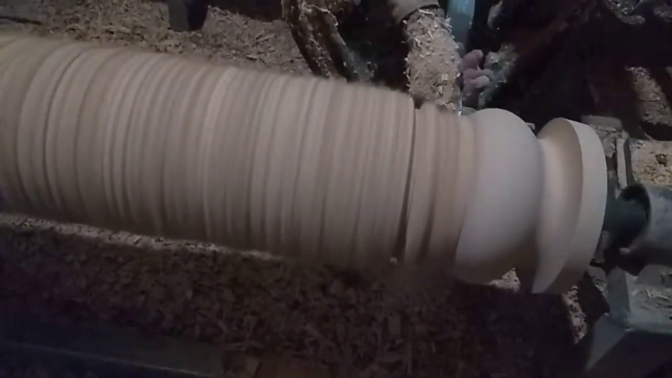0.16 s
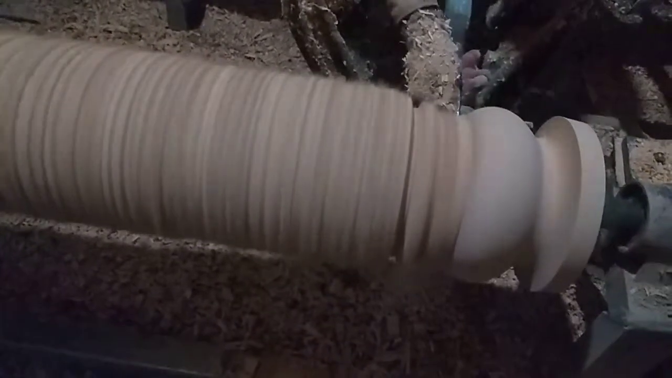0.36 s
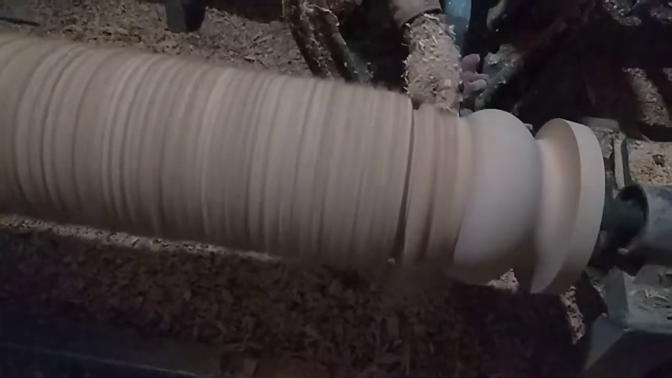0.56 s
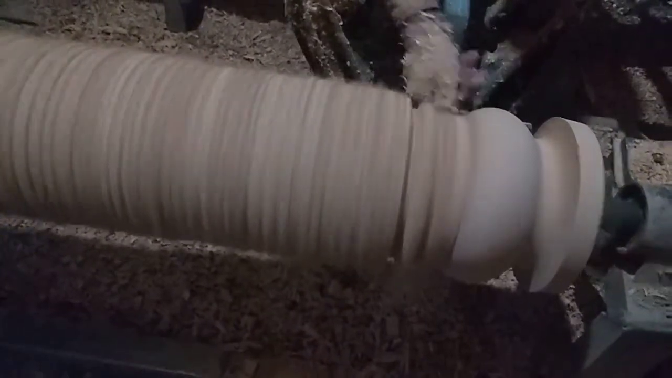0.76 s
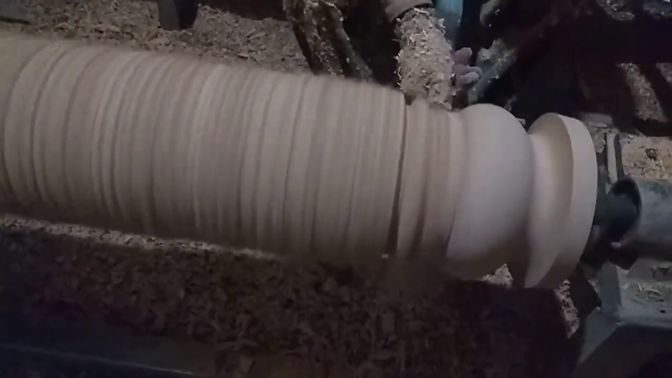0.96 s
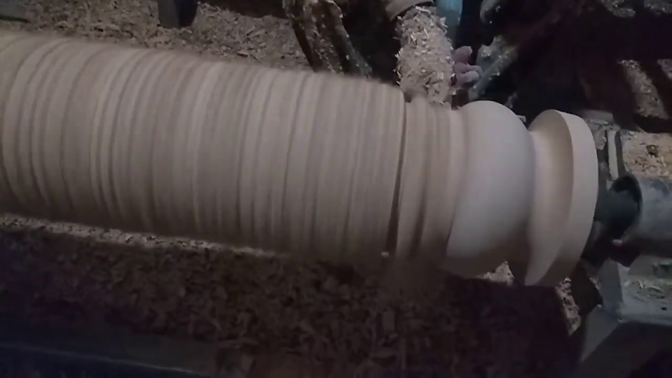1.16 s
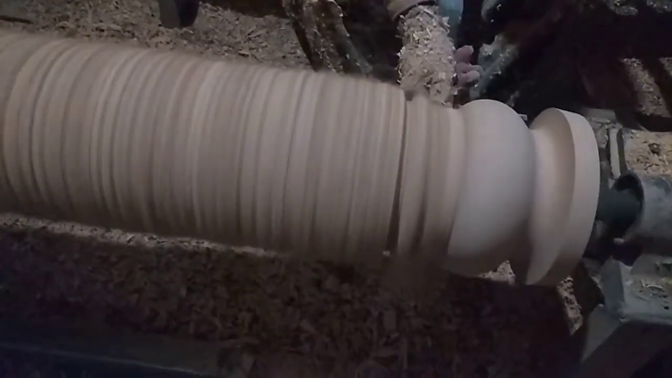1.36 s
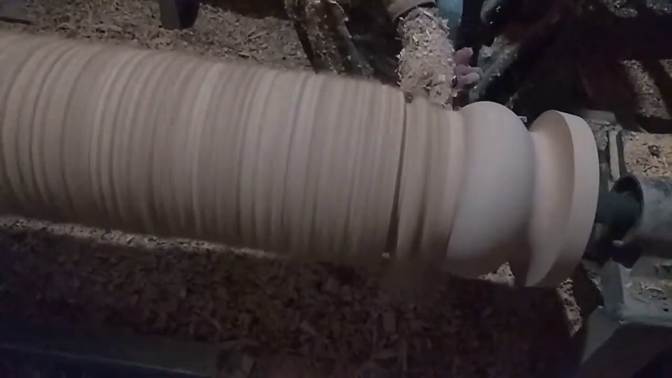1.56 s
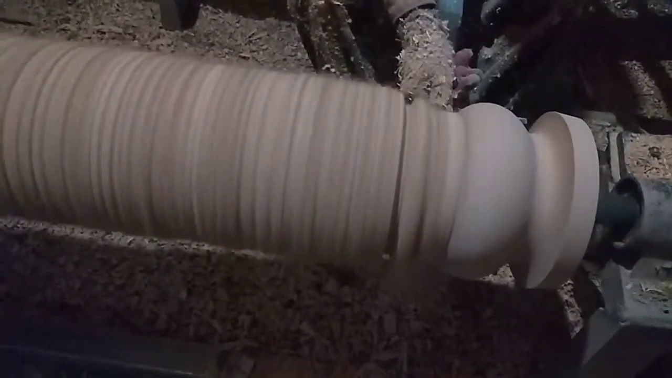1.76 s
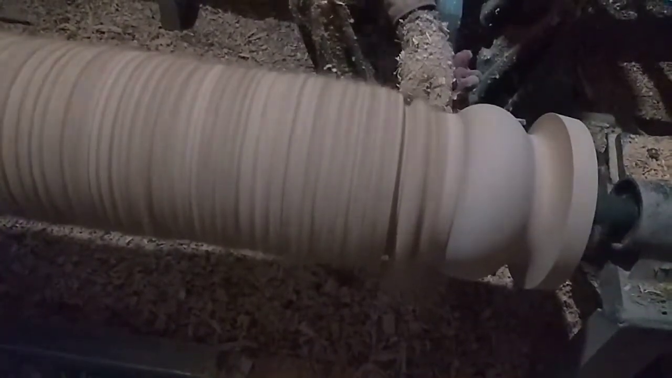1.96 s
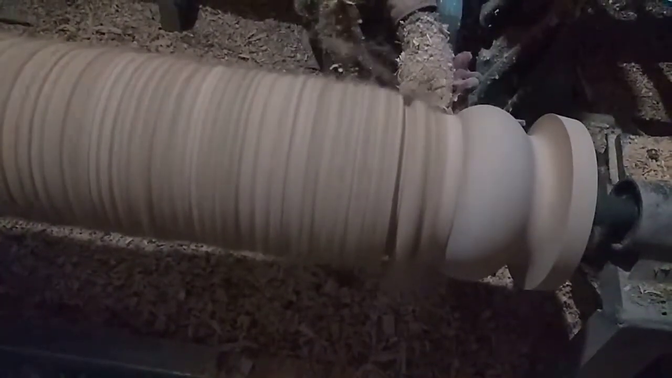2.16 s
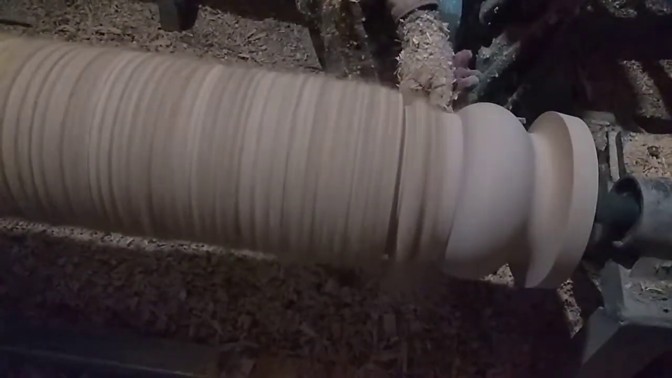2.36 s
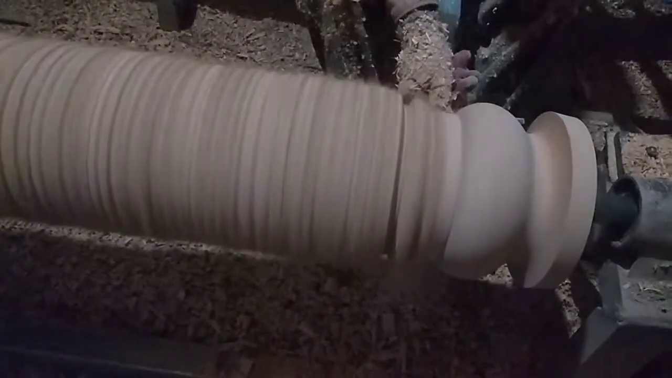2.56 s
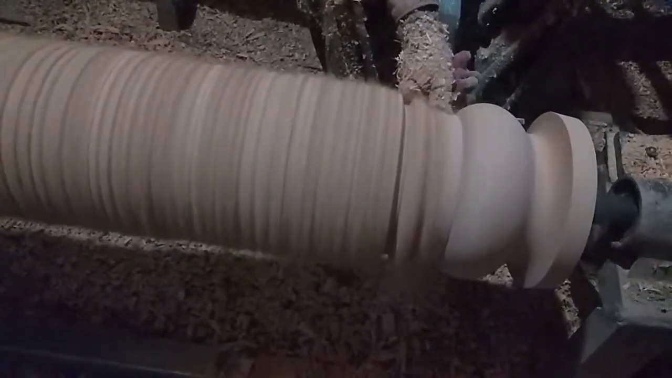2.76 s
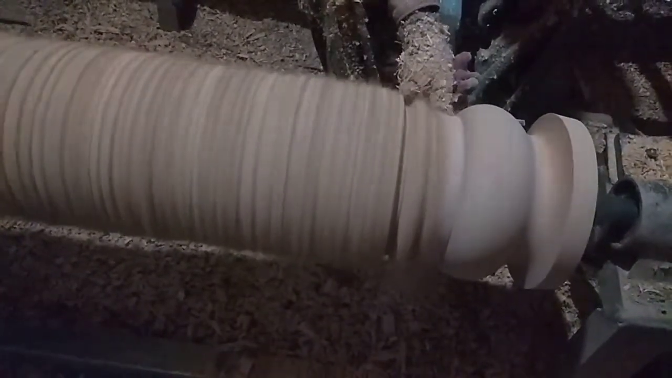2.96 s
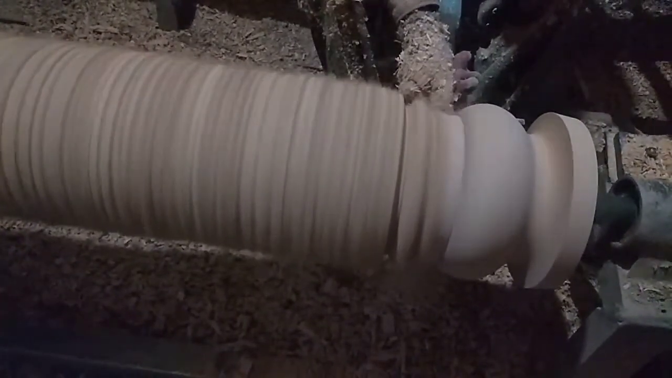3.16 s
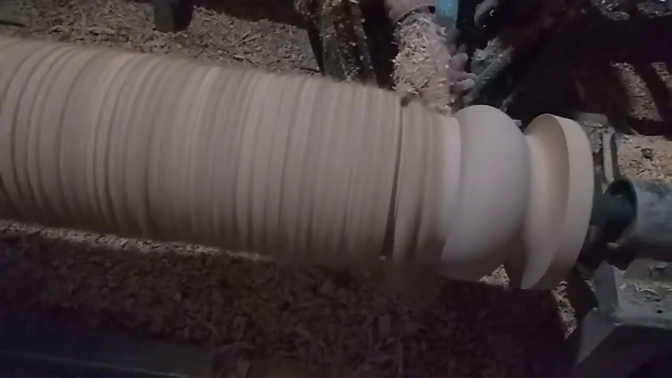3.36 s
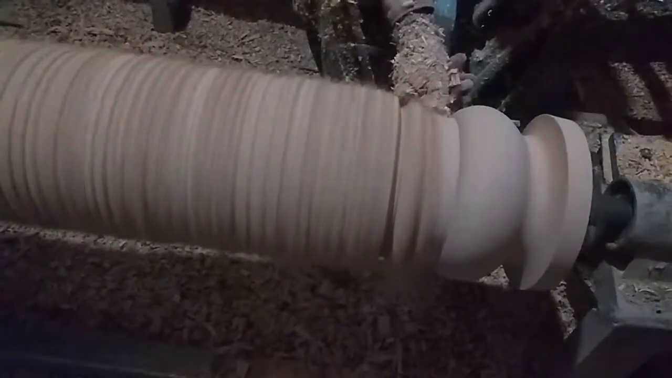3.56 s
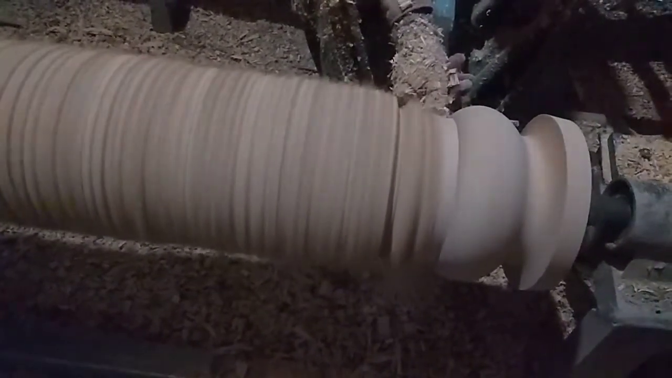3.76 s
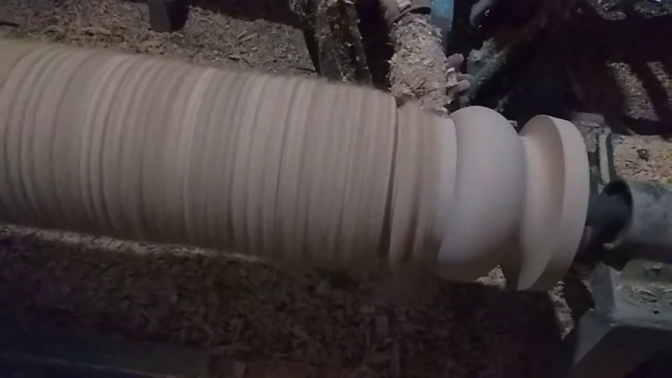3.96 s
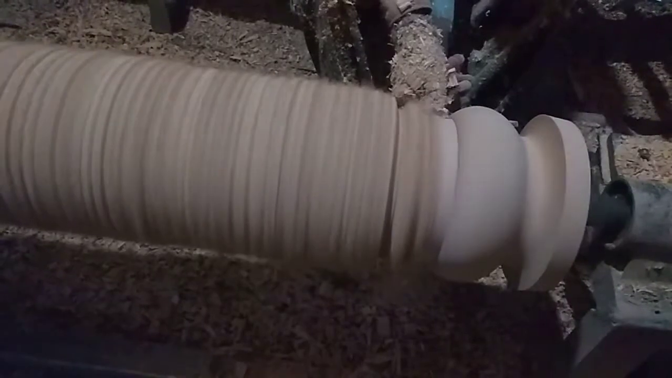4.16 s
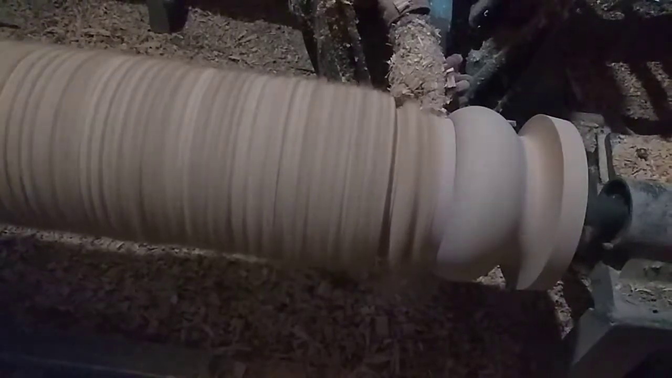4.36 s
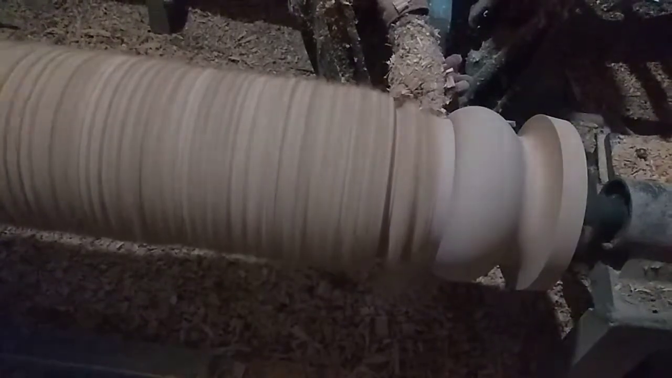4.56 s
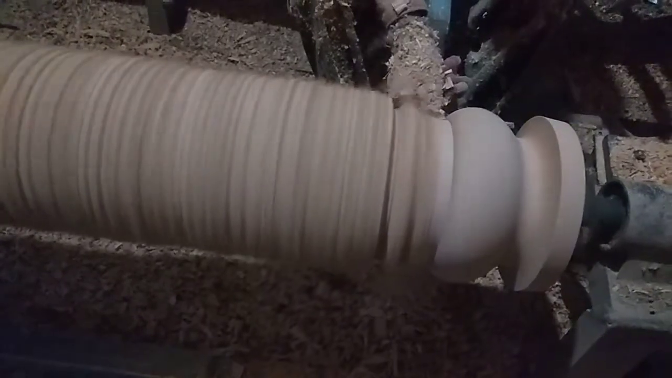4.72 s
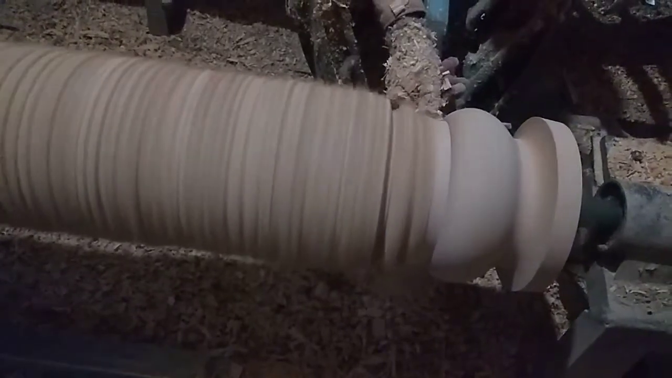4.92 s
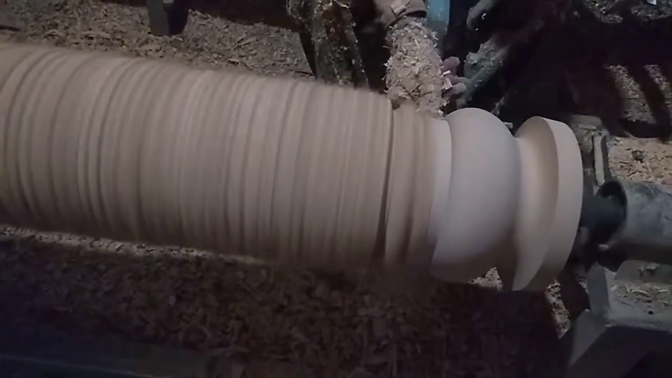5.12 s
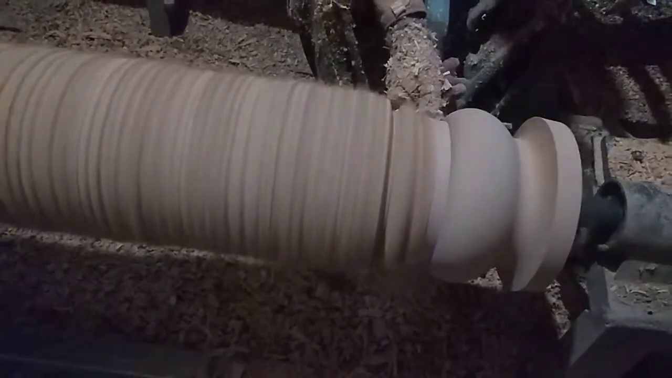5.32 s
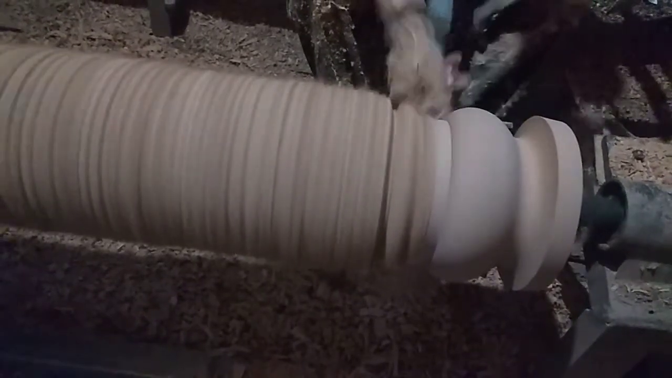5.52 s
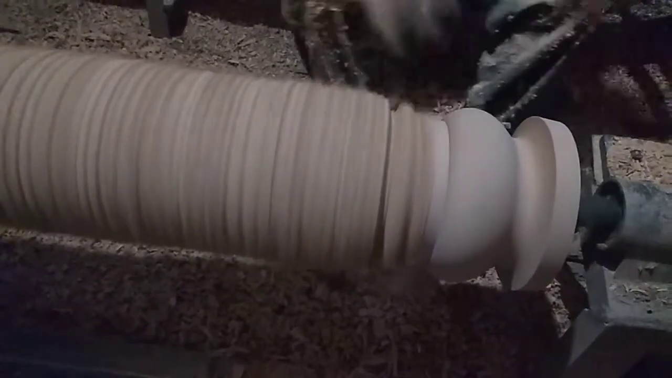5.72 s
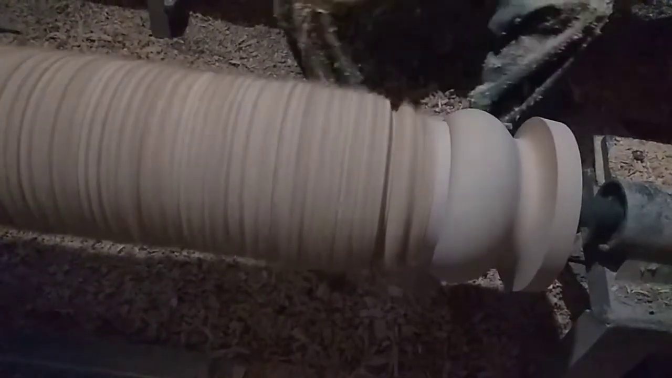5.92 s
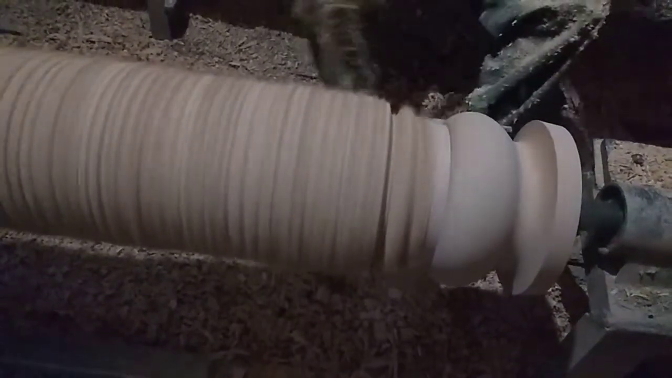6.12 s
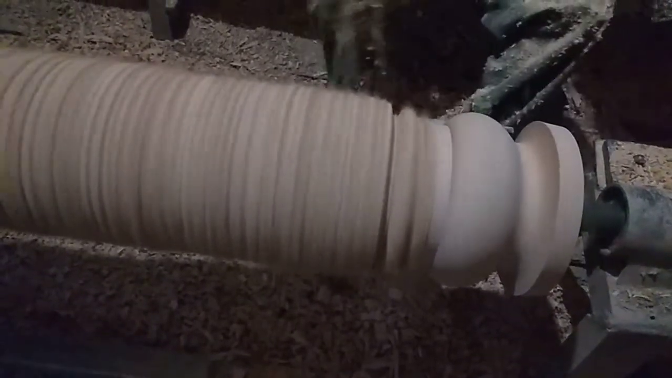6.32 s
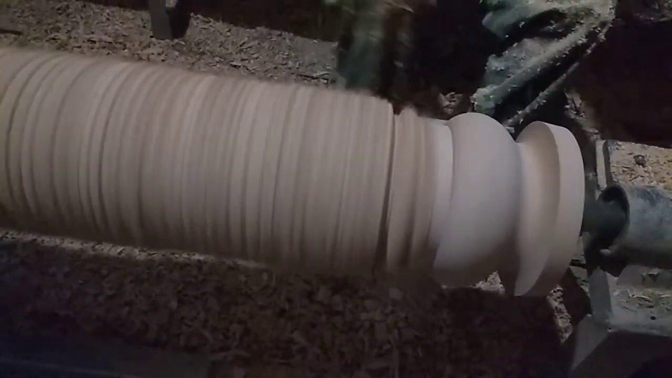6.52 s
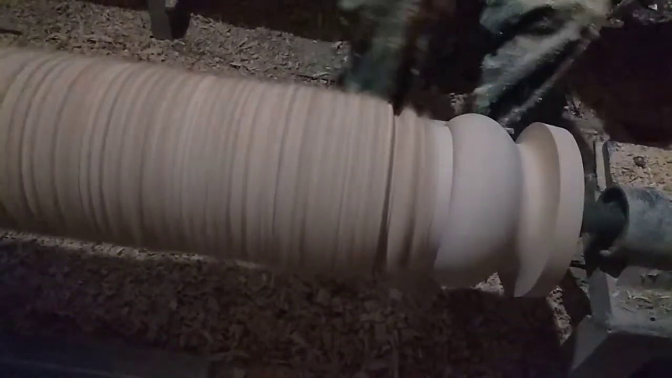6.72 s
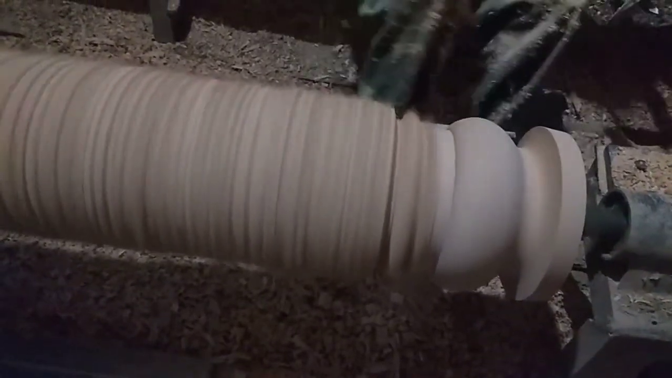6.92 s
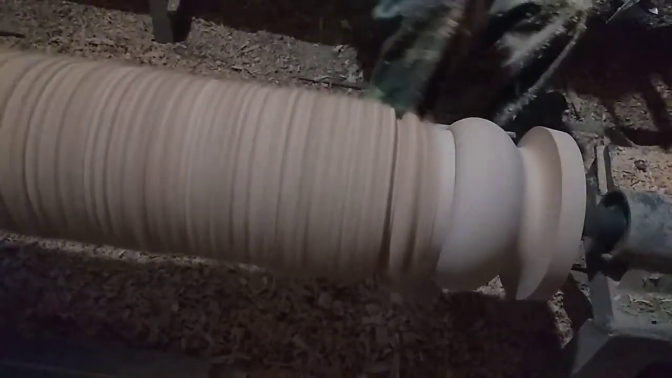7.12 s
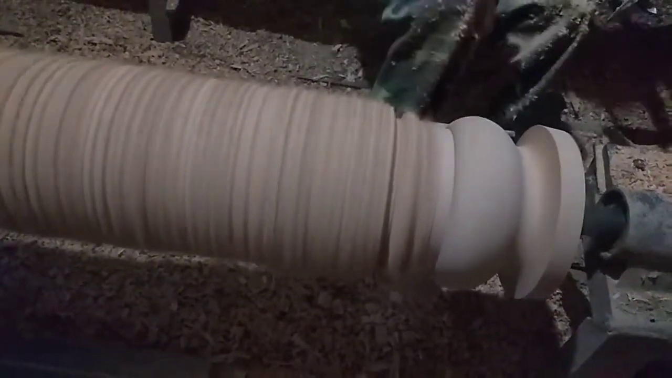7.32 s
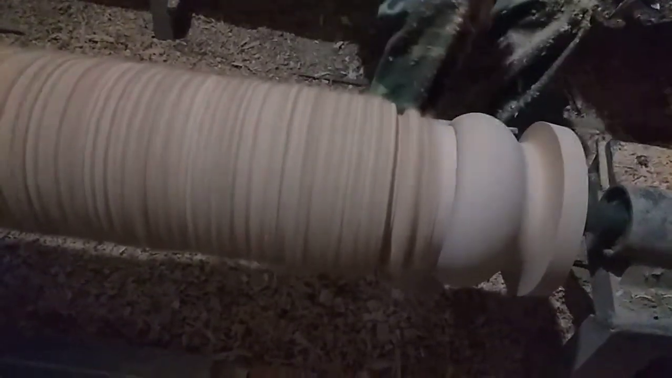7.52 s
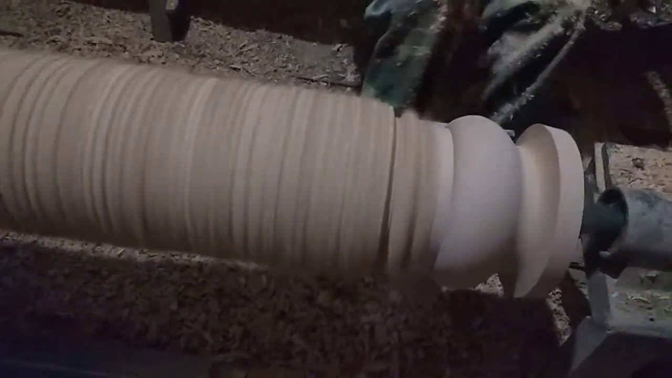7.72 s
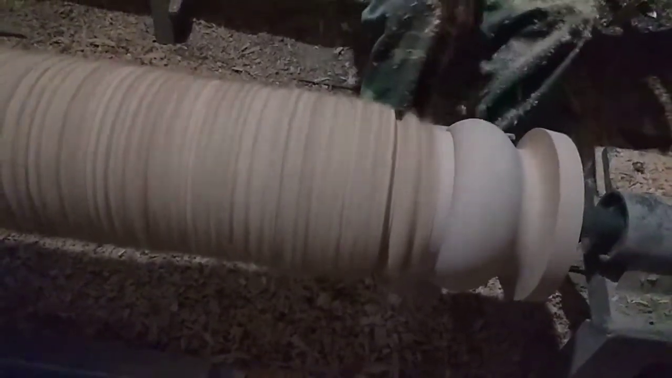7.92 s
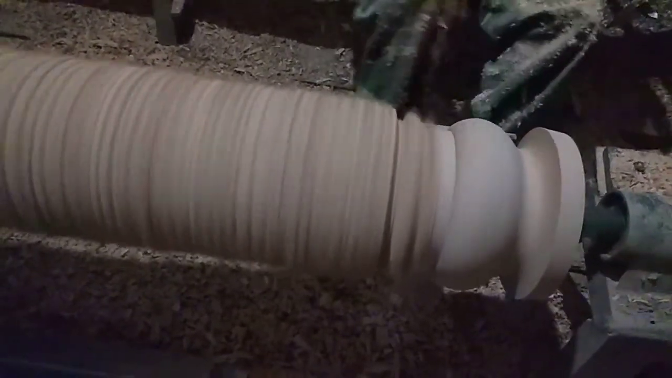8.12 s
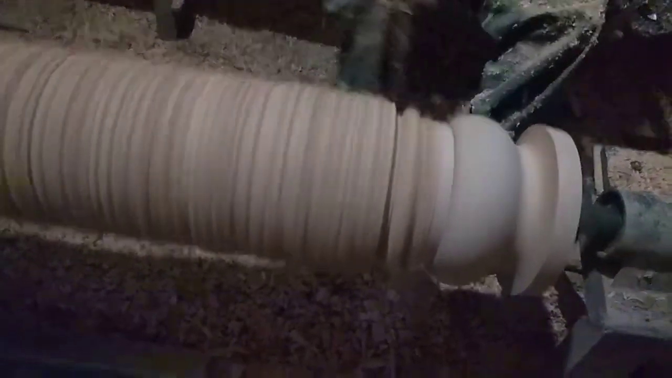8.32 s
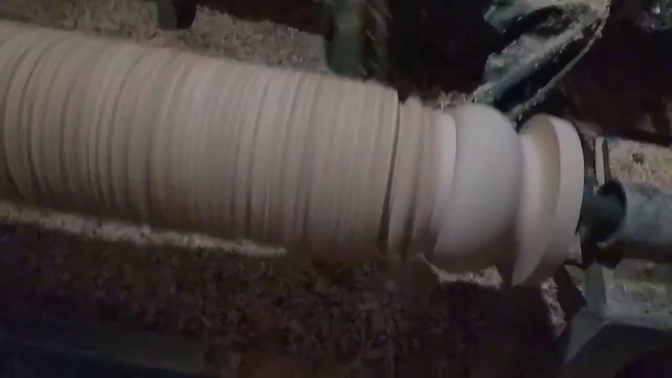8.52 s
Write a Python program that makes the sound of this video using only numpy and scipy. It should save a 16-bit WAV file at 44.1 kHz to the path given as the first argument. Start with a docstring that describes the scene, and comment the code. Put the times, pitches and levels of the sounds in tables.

```python
"""Gouge on a wood lathe

A big wooden blank spins on a heavy lathe in a shed, heard close up in stereo. A hand-held gouge makes
three passes: tearing fibres hiss in the blade and scrape in the shank, and the edge bites on hard grain.
The drive rumbles in the iron bed, loose steel rattles and clanks, and a thin guard dings twice.
The gouge lifts away and the lathe runs on."""
import sys
import numpy as np
from scipy import signal
from scipy.fft import rfft, irfft, next_fast_len
from scipy.io import wavfile
from scipy.ndimage import uniform_filter1d

SR = 44100
rng = np.random.default_rng(int(sys.argv[2]) if len(sys.argv) > 2 else 0)


def unload_wav(signal):
    """Save mono or channel-first audio to the path in sys.argv[1] as 16-bit WAV at rate SR, clipped to [-1, 1]."""
    wavfile.write(
        sys.argv[1],
        SR,
        np.round(np.clip(np.atleast_2d(signal).T, -1, 1) * 32767).astype(np.int16),
    )


N = 378378
T = np.arange(N) / SR
FFT_SIZE = next_fast_len(N)
FFT_HZ = np.fft.rfftfreq(FFT_SIZE, 1 / SR)


# Depth of cut, as a balance against the hiss: (time [s], scrape [dB], tearing [dB])
CUT_DEPTH = [(0.2, -4, -2.5), (1.2, -13.5, -8.5), (1.61, -7.5, -8), (1.91, -9.5, -12.5), (2.08, -5.5, -4.5),
             (2.7, -8.5, -13), (2.95, -4.5, -8.5), (3.15, -10, -13.5), (3.28, -6, -9), (3.36, -9.5, -16.5),
             (3.49, -8.5, -13), (3.6, -12.5, -17.5), (4.1, -12, -19), (4.5, -14, -18.5), (4.6, -12.5, -19),
             (4.8, -16, -20), (5.45, -14.5, -18.5)]
# The edge skips over low spots: (time [s], dip [dB], length [s])
SKIPS = [(1.47, 2, 0.036), (2.84, 3, 0.14), (3.14, 0.5, 0.081), (3.34, 3, 0.11), (3.55, 5, 0.042),
         (4.23, 9, 0.017), (4.3, 5, 0.04), (4.725, 7, 0.072), (4.87, 3, 0.054), (4.94, 3, 0.036),
         (5.09, 2, 0.045), (5.31, 6, 0.062)]
# Noise colours of bright hiss, dull scrape and thick shavings: (frequency [Hz], relative level [dB])
HISS_EQ = [(4410, -72), (7500, -3.5), (7610, -39), (9500, -21), (9980, 4), (11900, 4.5), (14100, 3),
           (14800, -4), (15500, -53)]
SCRAPE_EQ = [(980, -60), (1130, -8), (2200, -15), (2700, -4.5), (3450, -9.5), (3800, -10), (4300, -4),
             (4600, -19.5), (5500, -22.5), (6500, -11), (8000, -34)]
TEAR_EQ = [(2650, -45), (4650, -5), (4900, -7.5), (5600, -0.5), (6180, -15), (6400, -7), (6600, -8),
           (6870, -11), (7010, -19), (9410, -1.5), (10500, -0.5), (13600, -35), (22000, -120)]
# Ring of blade, shank, and wood with blade root: (frequency [Hz], width [Hz], relative level [dB])
BLADE_MODES = [(9370, 100, -6), (10080, 60, -3), (10300, 90, -2), (11045, 70, -1), (11650, 80, -2),
               (12160, 70, 1), (12400, 70, 0), (12610, 50, -1), (13030, 60, -2), (13400, 50, 0),
               (14000, 90, -3), (14600, 80, 0), (15270, 150, -5), (15600, 80, -8)]
SHANK_MODES = [(1165, 70, -5), (1280, 160, -10), (2480, 120, -6), (2620, 150, 2), (2970, 110, -6),
               (3300, 70, -8), (3672, 50, 5), (3935, 70, -1), (4040, 100, 0), (4478, 45, -3),
               (4690, 60, -6), (6095, 60, -4)]
TEAR_MODES = [(4920, 60, 4), (5145, 45, 3), (5700, 70, 4), (5960, 120, 4), (6330, 90, 3), (7040, 100, 1),
              (7670, 90, 1), (8100, 120, 3), (8410, 70, 0), (8700, 110, 4), (9360, 120, 5)]


def gouge(noise):
    """Fibres tear at the edge: a bright hiss in the blade, a duller scrape in shank and wood."""
    turn_s, ridges = 0.22, 11  # the ridges round the rim throb under the edge
    throb_db = 0.55 * np.cos(2 * np.pi * ridges * T / turn_s + 1.3)
    pressure = contact() * amp(dips(SKIPS) + throb_db + 1.43 * wander(10.0))
    catches = bites()
    blade_force = pressure + catches
    shank_force = pressure + amp(4) * catches  # a bite shakes the shank harder than the blade
    shank_force *= amp(curve(CUT_DEPTH, column=1) + 0.45 * wander(11.0))
    tear_force = blade_force * amp(curve(CUT_DEPTH, column=2))
    hiss = ring(blade_force, noise, HISS_EQ, BLADE_MODES, modes_db=10.5, band_hz=(9500, 15000))
    scrape = ring(shank_force, noise, SCRAPE_EQ, SHANK_MODES, modes_db=1.5, band_hz=(2300, 4200))
    tear = ring(tear_force, noise, TEAR_EQ, TEAR_MODES, modes_db=0.5, band_hz=(7000, 9300))
    return hiss + scrape + tear


# Gouge on the wood: (full contact [s], lift-off [s], level at contact [dB], level at lift-off [dB])
PASSES = [(0.223, 0.767, -34.5, -29), (1.22, 1.611, -19, -17.5), (1.902, 5.423, -17.5, -21.5)]


def contact():
    """Envelope of the passes: quick entry, slowly changing pressure, quick lift."""
    entry_db_per_s, lift_db_per_s = 208, 230
    pressure = np.zeros(N)
    for on, off, on_db, off_db in PASSES:
        held_db = np.interp(T, (on, off), (on_db, off_db))
        fade_db = entry_db_per_s * np.maximum(on - T, 0) + lift_db_per_s * np.maximum(T - off, 0)
        pressure += amp(held_db - fade_db)
    return pressure


# Accents in the cut: (time [s], strength [dB], decay [s])
BITES = [(1.147, -22, .012), (1.195, -17, .012), (1.379, -14, .012), (1.494, -26, 0.011),
         (1.903, -24, 0.015), (1.995, -28, .015), (2.055, -30, .015), (2.1271, -29, 0.018),
         (2.178, -22, .015), (2.24, -32, .01), (2.32, -32, .015), (2.391, -19.5, 0.027),
         (2.857, -20, 0.011), (3.1634, -17.5, 0.019), (3.214, -14, 0.021), (3.257, -17, 0.016),
         (3.381, -15, 0.018), (3.456, -22.5, 0.023), (3.483, -15.5, 0.015), (3.571, -17, 0.014),
         (3.66, -15, .012), (3.698, -14, 0.011), (3.806, -13, 0.0099), (3.927, -19, .012),
         (3.967, -24, 0.01), (4.026, -22.5, 0.019), (4.084, -18, .012), (4.135, -15.5, 0.028),
         (4.352, -13, 0.014), (4.403, -19, .01), (4.43, -26, .01), (4.468, -11, 0.0086),
         (4.529, -41, 0.019), (4.572, -11, 0.021), (4.6431, -13, 0.01), (4.683, -18, 0.013),
         (4.7496, -12, 0.0052), (4.789, -12, 0.0098), (4.838, -20, .005), (4.868, -23, 0.016),
         (4.962, -13.5, 0.02), (5.0117, -12, .006), (5.05, -15, .005), (5.11, -12, 0.0054),
         (5.149, -8, 0.0083), (5.172, -27, 0.011), (5.218, -19, 0.016), (5.252, -15, 0.0096),
         (5.3524, -17, 0.028)]


def bites():
    """The edge catches hard grain: spikes of force, each with an attack in proportion to its decay."""
    t = T[:SR // 4]
    force = np.zeros(N + len(t))
    for start, db, decay_s in BITES:
        attack = 1 - np.exp(-t / (0.19 * decay_s))
        force[int(start * SR):][:len(t)] += amp(db) * attack * np.exp(-t / decay_s)
    return force[:N]


# Rumble fader, sinking under the hardest cutting: (time [s], level [dB], housing against rumble [dB])
DRIVE_LEVELS = [(0.0, -25.5, 2), (0.6, -26.5, 4.5), (1.22, -27, 5), (1.38, -37.5, 6), (1.62, -35.5, 4),
                (1.74, -28.5, 7), (1.92, -33.5, 0.5), (2.02, -38, -1), (2.5, -40.5, 2.5), (3.3, -39, 0.5),
                (3.5, -36, 1.5), (4.13, -34, 1.5), (4.7, -37, 0), (5.0, -33, 0.5), (6.55, -34.5, 2),
                (6.8, -31.5, -1), (7.75, -33, 4), (8.58, -37.5, -9)]
# Noise colour of the rumble: (frequency [Hz], relative level [dB])
RUMBLE_EQ = [(24, -58), (40, -35), (182, -1.5), (442, -10), (746, -5.5), (920, -16.5), (1030, -10.5),
             (1780, -11.5), (3000, -21), (3900, -35), (6600, -120)]
# Ring of the iron bed and the housing: (frequency [Hz], width [Hz], relative level [dB])
BED_MODES = [(105.3, 7.8, -6), (136, 22.5, -2), (174.6, 8.8, 7.5), (190.7, 21.6, 4), (391, 34, -5.5),
             (487, 22, -4.5), (1034, 14, -4), (1848, 34, -2.5)]
HOUSING_MODES = [(649, 34, -2), (694, 21, -8.5), (752, 46, 0.5), (715, 39, -8), (792.7, 23, -4)]
# The housing booms out: (time [s], strength [dB])
BOOMS = [(0.8, -23), (1.15, -29), (2.53, -32), (2.82, -26), (4.95, -25), (5.5, -33), (5.8, -24),
         (6.85, -17), (7.1, -17.5), (7.32, -29), (7.47, -24), (8.35, -29)]


def drive(noise):
    """Motor and gears shake the iron bed into a low rumble; the housing rings and booms above it."""
    bed_force = amp(curve(DRIVE_LEVELS, column=1) + 0.25 * lulls() + 0.43 * wander(2.4))
    housing_force = bed_force * amp(curve(DRIVE_LEVELS, column=2) + 0.65 * wander(57.0))
    housing_force += jolts(BOOMS, attack_s=0.0088, decay_s=0.027)
    housing_eq = [(400, -38.5), (1100, -17.5), (1500, -73.5)]  # (frequency [Hz], relative level [dB])
    bed = ring(bed_force, noise, RUMBLE_EQ, BED_MODES, modes_db=0.13, band_hz=(100, 250))
    housing = ring(housing_force, noise, housing_eq, HOUSING_MODES, modes_db=0, band_hz=(600, 820))
    return bed + housing


# Single hits of steel on steel: (time [s], relative strength [dB])
CLANKS = [(0.0184, -42), (0.196, -22.5), (0.3501, -20), (0.606, -37), (0.6923, -26), (0.749, -22),
          (0.9218, -20), (1.0221, -22), (1.2516, -32), (1.4317, -19.5), (1.5105, -16), (1.916, -27),
          (2.6664, -18), (3.4491, -35), (4.6344, -25), (5.1736, -21), (5.6855, -29), (5.8042, -28),
          (5.984, -22), (6.1135, -25.5), (6.2415, -25), (6.3809, -31), (6.4816, -35), (6.5116, -27),
          (6.6605, -21), (6.765, -30.5), (6.8138, -29), (6.8927, -25.5), (7.0229, -35), (7.332, -27),
          (7.4559, -28), (7.4859, -25), (7.718, -22.5), (8.0047, -33), (8.0193, -23), (8.2866, -27),
          (8.3668, -25.5)]
# Noise colour under all the ringing steel: (frequency [Hz], relative level [dB])
STEEL_EQ = [(2500, -29), (3500, -17.5), (4200, -10.5), (5300, -17.5), (6450, -8.5), (6700, -33),
            (7100, -11), (8500, -41)]
# Ring of the struck plate: (frequency [Hz], width [Hz], relative level [dB])
PLATE_MODES = [(1652, 30, -6), (3670, 110, -5), (4830, 60, -8), (5140, 60, -5), (5412, 45, 3),
               (5890, 60, -10), (8100, 90, -14)]


def clanks(noise):
    """A steel plate takes hard blows, each followed by a short chatter of bounces."""
    strikes = amp(17) * impulses(CLANKS)
    pan = amp(at_hz(MACHINE_PAN, FFT_HZ) / 2)  # the blows sit in the machine's stereo image
    placement = np.array([pan, np.exp(-1j * at_hz(MACHINE_PHASE, FFT_HZ)) / pan])
    blows = irfft(rfft(strikes, FFT_SIZE) * placement, FFT_SIZE)[:, :N]
    bounces = amp(1.5) * jolts(CLANKS, attack_s=0.001, decay_s=0.0069) * noise
    return ring(blows + bounces, np.ones((2, N)), STEEL_EQ, PLATE_MODES,
                modes_db=9, band_hz=(4500, 6200), order=1)


# Slow fader of the shaking steel: (time [s], level [dB])
RATTLE_LEVELS = [(0.0, -25), (0.75, -24.5), (1.05, -25), (1.34, -22.5), (1.6, -32.5), (1.91, -30.5),
                 (2.3, -39.5), (2.7, -33), (3.2, -42), (3.6, -34.5), (4.5, -39.5), (5.2, -35), (5.6, -33),
                 (6.5, -38.5), (7.3, -35), (7.9, -36), (8.58, -39.5)]
# Noise colour of belt and bearings: (frequency [Hz], relative level [dB])
WHIRR_EQ = [(530, -35), (960, -12), (1080, 3.5), (1820, 3), (2690, 0), (3760, -6), (4180, -13),
            (4650, -10.5), (5240, -6.5), (6400, -13), (6700, -36), (6850, -26), (7800, -6.5), (9740, -3.5),
            (11000, -1.5), (15500, -11.5)]
# Ring of the loose parts: (frequency [Hz], width [Hz], relative level [dB])
LOOSE_MODES = [(1652, 35, 1), (3290, 70, -6), (3660, 110, -6), (4460, 100, -1), (4830, 60, -2),
               (5140, 60, -4), (5405, 70, -2), (5700, 60, -8), (5885, 70, -9), (3065, 50, -9),
               (5040, 50, -6), (6420, 140, -9), (6880, 100, -14), (7310, 130, -9), (8090, 90, -10)]


def rattle(noise):
    """Loose steel shakes, stirred by each clank, over the steadier whirr of belt and bearings."""
    aftershake = amp(-6.5) * jolts(CLANKS, attack_s=0.0044, decay_s=0.019)
    level_db = 20 * np.log10(amp(curve(RATTLE_LEVELS, column=1)) + aftershake) + lulls()
    smooth_db = uniform_filter1d(level_db, size=SR // 2)
    whirr_force = amp(smooth_db + 0.58 * (level_db - smooth_db) - 9.0 + 2.04 * wander(17.0))
    steel_force = amp(level_db + wander(22.0))
    whirr = ring(whirr_force, noise, WHIRR_EQ, modes=[], modes_db=0, band_hz=(4500, 6200))
    steel = ring(steel_force, noise, STEEL_EQ, LOOSE_MODES, modes_db=2.0, band_hz=(4500, 6200))
    return whirr + steel


# Gaps in the rattle: (time [s], dip [dB], length [s])
LULLS = [(0.15, 8, 0.12), (0.55, 4.5, 0.21), (0.86, 7.5, 0.16), (1.07, 6, 0.068), (1.46, 8, 0.15),
         (1.77, 9, 0.066), (2.36, 3, 0.076), (2.79, 6, 0.091), (3.34, 12, 0.058), (4.3, 6, .08),
         (5.32, 5, 0.18), (5.57, 4.5, 0.29), (5.78, 6, 0.11), (5.95, 5.5, 0.054), (6.07, 2.5, 0.057),
         (6.2, 3, 0.23), (6.59, 2.5, 0.12), (6.72, 4.5, 0.078), (6.99, 7.5, 0.064), (7.41, 7, 0.048),
         (7.68, 4.5, 0.12), (8.0, 3.5, 0.27), (8.12, 8, 0.08), (8.29, 6.5, 0.066), (8.49, 8, 0.073)]


def lulls():
    """Ducking in dB: the rattle drops for a moment and the rumble follows a little."""
    return dips(LULLS)


# Knocks on the guard: (time [s], peak before panning [dB])
DINGS = [(0.1975, -15), (0.605, -21)]


def guard():
    """A thin guard is knocked and rings on one dying note, louder on the right."""
    pitch_hz, t60_s = 1666, 0.56
    t = T[:SR // 2]
    note = np.sin(2 * np.pi * pitch_hz * t) * amp(-60 * t / t60_s)
    ding = signal.oaconvolve(impulses(DINGS), note)[:N]
    return np.array([amp(-2) * ding, amp(2) * np.roll(ding, 17)])


def shed(sound):
    """The walls return a short diffuse tail, different on each side."""
    t60_s, predelay_s = 0.2, 0.004
    t = T[:SR // 3]
    tail = rng.standard_normal((2, len(t))) * amp(-60 * t / t60_s) * (t > predelay_s)
    return signal.oaconvolve(sound, tail / np.linalg.norm(tail[0]), axes=1)[:, :N]


def flicker(sound, depth_db):
    """Modes come and go as the contact shifts: random patches of level over time and frequency."""
    spectrogram = signal.stft(sound, nperseg=512)[2]
    patches = uniform_filter1d(rng.standard_normal(spectrogram.shape[1:]), size=2, axis=0)
    patches = uniform_filter1d(patches, size=6, axis=1)
    return signal.istft(spectrogram * amp(depth_db * unit_rms(patches)), nperseg=512)[1][:, :N]


def ring(force, carrier, eq, modes, modes_db, band_hz, order=2):
    """Force times carrier shakes a resonant body; unit force on white noise gives rms 1 in band_hz."""
    size = 8192
    hz = np.fft.rfftfreq(size, 1 / SR)
    power = amp(at_hz(eq, hz)) ** 2
    for centre, width, db in modes:
        power += amp(db + modes_db) ** 2 / (1 + (2 * (hz - centre) / width) ** 2) ** order
    in_band = (hz > band_hz[0]) & (hz < band_hz[1])
    power /= 2 * power[in_band].sum() / size
    cepstrum = irfft(np.log(power + 1e-9) / 2)
    cepstrum[1:size // 2] *= 2
    cepstrum[size // 2 + 1:] = 0  # minimum phase, so the modes ring after a hit
    response = irfft(np.exp(rfft(cepstrum)))
    shifted = np.roll(carrier, rng.integers(N), axis=1)  # each layer gets its own stretch of noise
    return signal.oaconvolve(force * shifted, response[None], axes=1)[:, :N]


def stereo_noise(likeness, pan, phase):
    """White noise at two microphones: partly shared, unequal in level, shifted in phase."""
    shared, own = rfft(rng.standard_normal((2, N)), FFT_SIZE)
    share = np.clip(at_hz(likeness, FFT_HZ), 0, 1)
    left_gain = amp(at_hz(pan, FFT_HZ) / 2)
    right = share * shared * np.exp(-1j * at_hz(phase, FFT_HZ)) + np.sqrt(1 - share ** 2) * own
    return irfft(np.array([shared * left_gain, right / left_gain]), FFT_SIZE)[:, :N]


def impulses(rows):
    """One click for each (time [s], level [dB]) row."""
    clicks = np.zeros(N)
    times, db = np.transpose(rows)
    clicks[(times * SR).astype(int)] = amp(db)
    return clicks


def jolts(rows, attack_s, decay_s):
    """Envelope of sudden hits that die away."""
    t = T[:SR // 4]
    shape = np.exp(-t / decay_s) * (1 - np.exp(-t / attack_s))
    return signal.oaconvolve(impulses(rows), shape)[:N]


def dips(rows):
    """Brief bell-shaped drops of level, in dB."""
    return -sum(db * np.exp(-(2 * (T - time) / length) ** 2) for time, db, length in rows)


def wander(rate_hz):
    """Random modulation: low-passed noise of rms 1."""
    pole = np.exp(-2 * np.pi * rate_hz / SR)
    return unit_rms(signal.lfilter([1], [1, -pole], rng.standard_normal(N)))


def curve(rows, column):
    """One column of a timed table as a fader curve."""
    columns = np.transpose(rows)
    return np.interp(T, columns[0], columns[column])


def at_hz(rows, hz):
    """Reads a table on a log-frequency axis."""
    frequencies, values = np.transpose(rows)
    return np.interp(np.log(hz + 1), np.log(frequencies + 1), values)


def amp(db):
    """Gain of a level in dB."""
    return 10 ** (np.asarray(db) / 20)


def unit_rms(x):
    """Scales to rms 1."""
    return x / np.sqrt(np.mean(x ** 2) + 1e-20)


# Stereo focus of machine and cut: (frequency [Hz], left-right likeness [0 to 1])
MACHINE_LIKENESS = [(60, 1), (200, 1), (400, 0.67), (800, 0.62), (1500, 0.35), (2900, .25), (4500, 0.7),
                    (5400, .65), (6700, .4), (8000, .12), (9800, .35), (10500, .1), (15000, 0.05)]
CUT_LIKENESS = [(1200, 0.5), (2000, .1), (2600, .5), (3250, .15), (3900, 0.8), (4400, .35), (7000, .5),
                (9500, .55), (11300, .3), (13300, .55), (14200, .3), (14700, .7), (15200, .25)]
# Their panning: (frequency [Hz], left minus right [dB])
MACHINE_PAN = [(60, -0.5), (270, -.5), (600, 2), (1300, -4), (2100, -3.5), (3300, 4.5), (5500, -3),
               (9000, 1.5), (15000, 12)]
CUT_PAN = [(1200, -4.5), (2400, 1.5), (3500, 1.5), (5500, -3), (9000, 0.5), (15000, 5.5)]
# Their phase between the microphones: (frequency [Hz], left lead [rad])
MACHINE_PHASE = [(0, 0), (500, -.3), (860, .9), (1200, 2.0), (1720, 4.1), (2240, 6.4), (2930, 9.3),
                 (3530, 12.7), (4300, 15.7), (4650, 15.8), (5200, 18.6), (5700, 18.9), (6400, 22),
                 (8100, 22), (10000, 28.4), (15200, 39.5)]
CUT_PHASE = [(0, 0), (1290, 0.6), (2600, .8), (3000, 2.4), (3500, 6), (4600, 6.5), (6300, 7.5), (6750, 9.3),
             (7450, 9.3), (8050, 12.8), (9800, 14), (11200, 15.5), (11900, 18.9), (12600, 19.4),
             (13300, 20.8), (14650, 21.3), (15200, 22)]


def scene():
    """The mix: gouge and steel feed the shed's reverb, the drive stays dry."""
    machine = stereo_noise(MACHINE_LIKENESS, MACHINE_PAN, MACHINE_PHASE)
    cut = stereo_noise(CUT_LIKENESS, CUT_PAN, CUT_PHASE)
    bright = flicker(rattle(machine) + gouge(cut), depth_db=3.1) + clanks(machine) + guard()
    return drive(machine) + bright + amp(-10.0) * shed(bright)


def record(dry):
    """A soft clip rounds the peaks, then a steep low-pass trims the top."""
    cutoff_hz = 15640
    clipped = 1.1 * dry / (1 + abs(dry) ** 4) ** 0.25
    lowpass = signal.firwin(511, cutoff_hz, window=("kaiser", 9), fs=SR)
    return signal.oaconvolve(clipped, lowpass[None], "same")


dry = scene()
out = record(dry)
unload_wav(out)
```